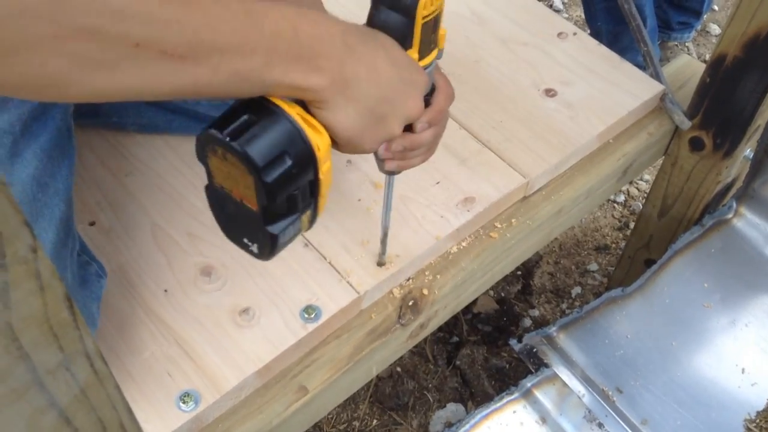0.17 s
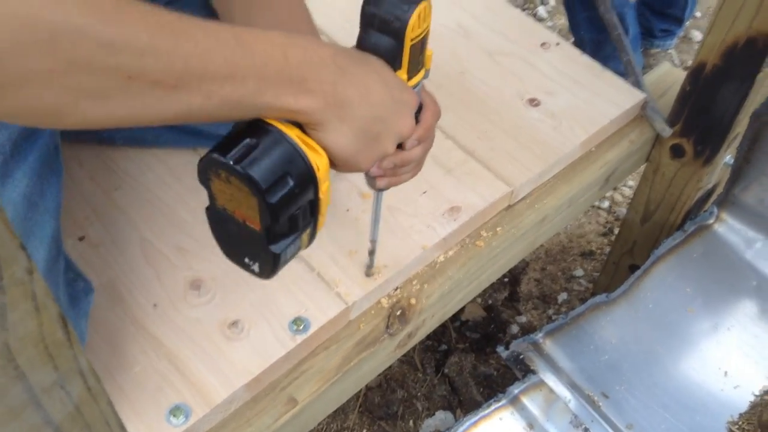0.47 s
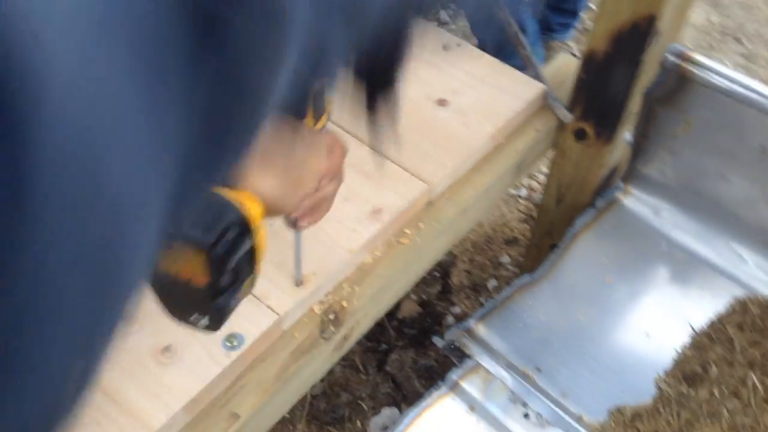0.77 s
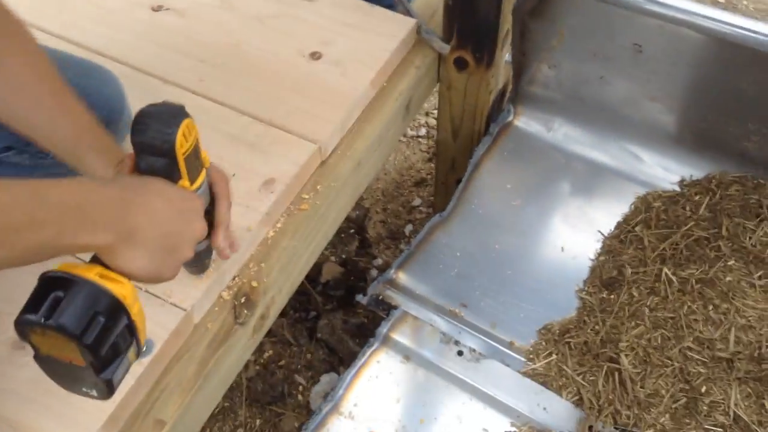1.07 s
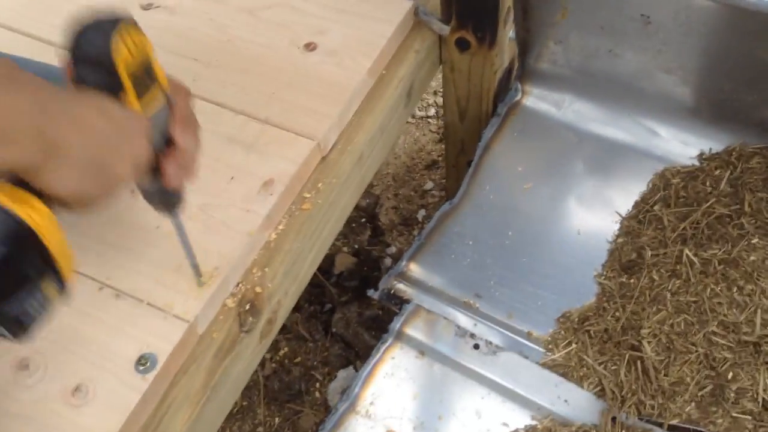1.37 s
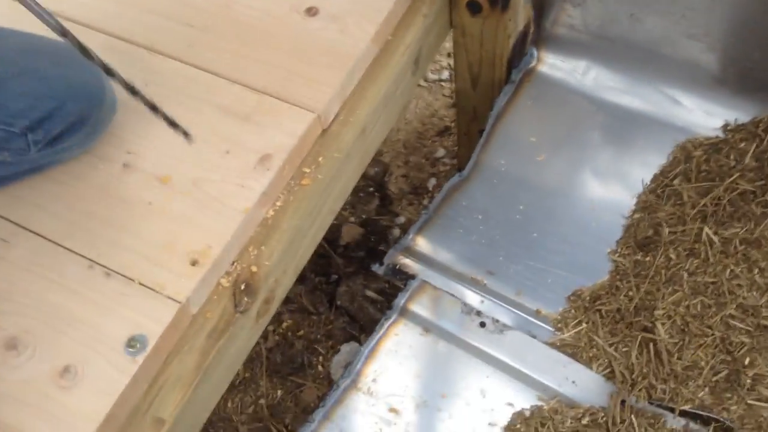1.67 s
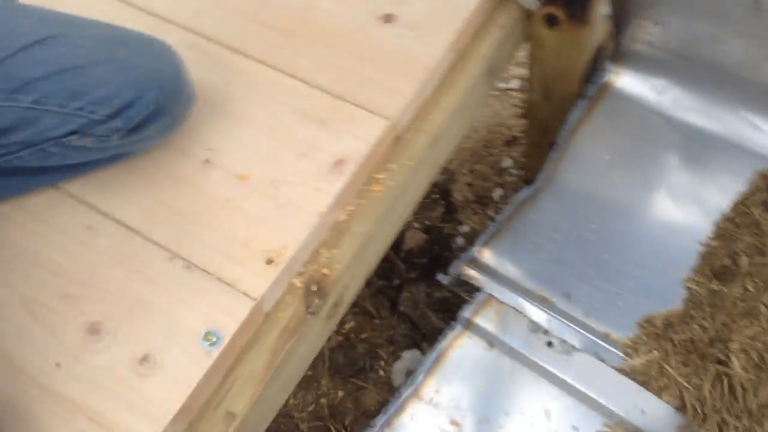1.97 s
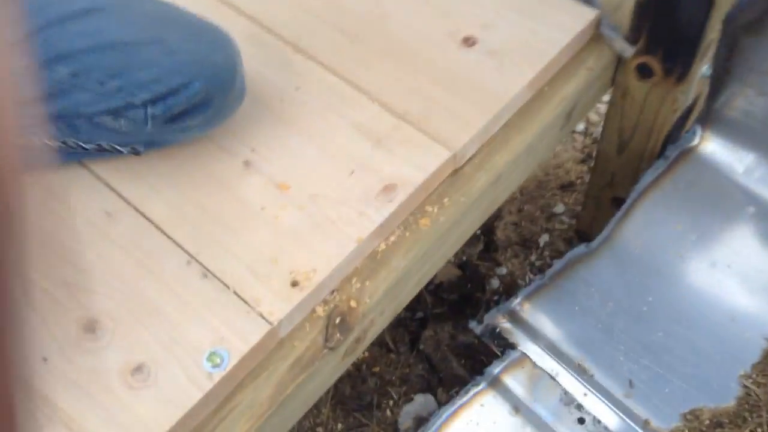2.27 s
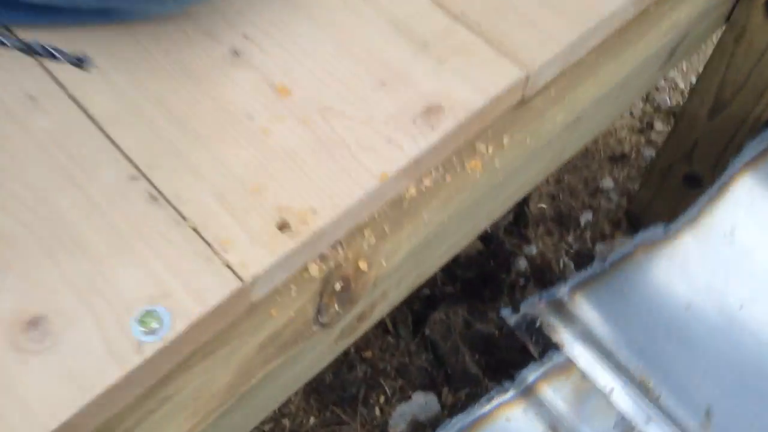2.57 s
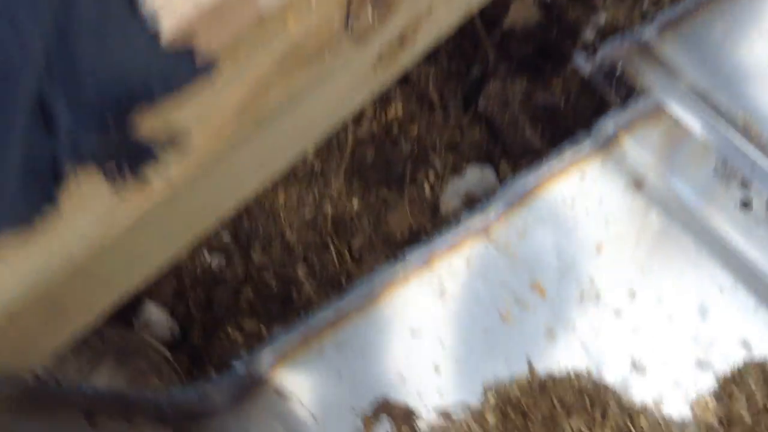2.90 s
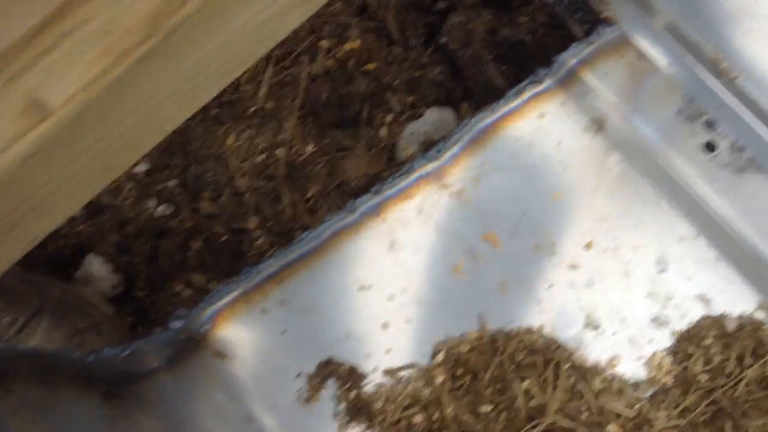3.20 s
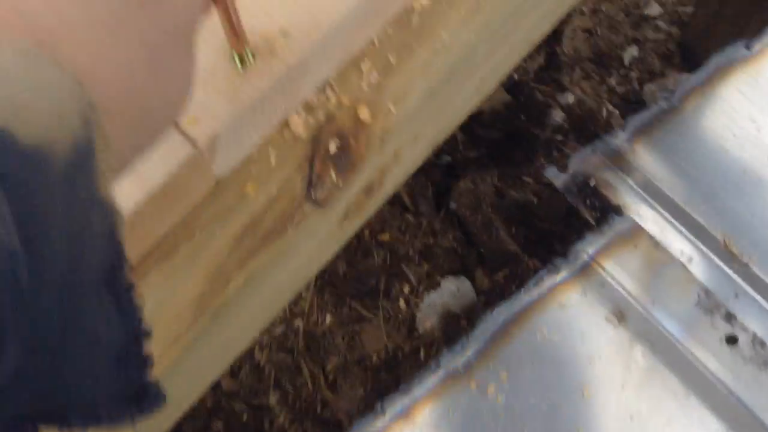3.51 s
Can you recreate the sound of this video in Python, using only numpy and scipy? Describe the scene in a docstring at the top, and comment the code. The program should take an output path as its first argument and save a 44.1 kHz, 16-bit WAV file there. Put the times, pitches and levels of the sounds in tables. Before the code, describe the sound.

Drill grinding into a wooden plank outdoors in buffeting wind, stopping abruptly before light clicks and knocks.

```python
"""Cordless drill in timber

A drill drives a long bit through a plank into a beam, is drawn back out and brakes: grain noise for rasp,
chatter and gears, shaft harmonics for the motor, gliding resonances for squeals and the faint free bit.
Shaped noise makes the wind buffets and open air; struck modes and decaying noise bursts make
a few metal clinks, light ticks and dull knocks on the boards."""
import sys
import numpy as np
from scipy import signal
from scipy.fft import rfft, irfft, next_fast_len
from scipy.io import wavfile
from scipy.ndimage import uniform_filter1d

SR = 44100
rng = np.random.default_rng(int(sys.argv[2]) if len(sys.argv) > 2 else 0)


def dump(signal):
    """Clip the signal to [-1, 1] and save it as 16-bit WAV at the path in sys.argv[1]."""
    limited = np.clip(np.atleast_2d(signal).T, -1, 1)
    pcm = np.round(limited * 32767).astype(np.int16)
    wavfile.write(sys.argv[1], SR, pcm)


N = 160965
T, HZ = np.arange(N) / SR, np.fft.rfftfreq(N, 1 / SR)


def amp(db):
    """Decibels to gain."""
    return 10 ** (np.asarray(db) / 20)


def unit(x):
    """Scales to rms 1."""
    return x / np.sqrt(np.mean(x ** 2) + 1e-20)


def curve(points):
    """Joins (time_s, value) points linearly over the whole scene."""
    return np.interp(T, *np.transpose(points))


def colour(x, points):
    """Filters x by (hz, gain_db) points on a log-frequency axis, to rms 1."""
    hz, db = np.transpose(points)
    gain = amp(np.interp(np.log(HZ + 1), np.log(hz), db))
    bass_loss = 1 + (40 / (HZ + 1)) ** 4
    return unit(irfft(rfft(x) * gain / bass_loss, N))


def noise(shape, size=N):
    """Gaussian noise with the magnitude shape(hz), at rms 1."""
    hz = np.fft.rfftfreq(size, 1 / SR) + 1  # +1 avoids division by zero
    return unit(irfft(rfft(rng.standard_normal(size)) * shape(hz), size))


def drift(rate_hz, size=N):
    """Slow random wavering, low-passed around rate_hz."""
    padded = next_fast_len(size + 8192)
    return noise(lambda f: 1 / (1 + (f / rate_hz) ** 2), size=padded)[:size]


def add(mix, start_s, sound):
    """Mixes a sound in at a time, trimming what falls outside."""
    at = round(start_s * SR)
    sound = sound[max(-at, 0):]
    part = mix[max(at, 0):][:len(sound)]
    part += sound[:len(part)]


def low_cut(x):
    """Second-order high-pass: the small microphone loses the deep bass."""
    return signal.sosfilt(signal.butter(2, 95, "high", fs=SR, output="sos"), x)


def air():
    """Quiet outdoor background noise with a thin, faint band of hiss around 7.5 kHz."""
    # open-air spectrum: hz, density_db
    air_spectrum = [(45, -7), (170, 18.5), (450, 6.5), (4800, -1), (6300, -12), (15000, -27.5)]
    # high hiss band: time_s, level_db
    hiss_level = [(2.3, -67), (2.9, -66.5), (3.25, -76)]
    air_db, hiss_hz, hiss_width_hz = -50.5, 7550, 1900
    hiss = noise(lambda f: 1 / (1 + (2 * (f - hiss_hz) / hiss_width_hz) ** 4))
    return amp(air_db) * colour(rng.standard_normal(N), air_spectrum) + amp(curve(hiss_level)) * hiss


def eddy(corner_hz):
    """Wind turbulence spectrum: steep slopes below 155 Hz and above corner_hz."""
    low_hz, rise_order, fall_order = 155.2, 4.24, 3.23

    def shape(f):
        low_side = 1 + (low_hz / f) ** (2 * rise_order)
        high_side = 1 + (f / corner_hz) ** (2 * fall_order)
        return 1 / np.sqrt(low_side * high_side)
    return shape


def wind():
    """Eddies thump the microphone as short noise swells over a low steady flutter."""
    # steady wind: time_s, mean_level_db
    breeze_level = [(0, -33), (.68, -23.5), (.92, -38.5), (1.2, -32.5), (1.8, -37), (2.2, -30), (2.5, -65),
                    (2.78, -49.5), (3.2, -62), (3.65, -47)]
    # buffets: middle_s, swell_scale_s, level_db, corner_hz
    gusts = [(0.01, 0.0043, -15, 490), (0.065, 0.0074, -22.5, 460), (0.145, 0.0086, -17, 373),
             (0.224, 0.0041, -15, 960), (0.244, 0.014, -17, 475), (0.402, 0.0075, -11.5, 504),
             (0.463, 0.0028, -14.5, 398), (0.489, 0.0075, -19.5, 410), (0.532, 0.0056, -10.5, 765),
             (0.658, 0.0067, -16.5, 740), (0.672, 0.0039, -10.5, 590), (0.737, 0.019, -18.5, 580),
             (1.046, 0.0044, -12.5, 556), (1.103, 0.029, -23.5, 530), (1.195, 0.0035, -11, 385),
             (1.218, 0.0024, -15.5, 430), (1.354, 0.0066, -22.5, 900), (1.449, 0.021, -24.5, 360),
             (1.498, 0.0063, -17.5, 377), (1.8053, 0.0012, -18.5, 810), (1.8168, 0.0066, -25, 646),
             (1.9, 0.014, -32, 480), (2.163, 0.0068, -17, 575), (2.195, 0.0084, -18.5, 640),
             (2.112, 0.0037, -28.5, 473), (2.336, 0.0028, -20, 290), (2.381, 0.0038, -24, 241),
             (2.452, 0.0027, -33, 229), (2.841, 0.0077, -39.5, 453), (3.141, 0.011, -43.5, 553)]
    breeze_hz, flutter_db, flutter_hz = 272, 2, 11.0
    out = amp(curve(breeze_level) + flutter_db * drift(flutter_hz)) * noise(eddy(breeze_hz))
    t = (np.arange(16384) - 8192) / SR
    for middle_s, scale_s, db, corner_hz in gusts:
        swell = 1 / np.cosh(np.minimum(abs(t / scale_s), 10))
        puff = low_cut(swell * noise(eddy(corner_hz), size=len(t)))
        level = amp(db) * np.linalg.norm(swell) / np.linalg.norm(puff)  # same energy as the swell
        add(out, middle_s + t[0], level * puff)
    return out


def ring(modes, width_hz, t):
    """Broad, beating (hz, level_db) modes of a struck object, before decay, at rms 1."""
    def shape(f):
        return sum(amp(db) / (1 + (2 * (f - hz) / width_hz) ** 2) for hz, db in modes)
    return noise(shape, size=len(t))


def click(peak_hz, octaves, t60_s, t):
    """Impact noise around one frequency, decaying exponentially."""
    burst = noise(lambda f: 1 / (1 + abs(np.log2(f / peak_hz) / octaves) ** 3), size=len(t))
    return amp(-60 * t / t60_s) * burst


def handling():
    """Impacts excite board and chuck modes plus noise; clinks leave a faint tail from the yard."""
    # dull knocks on the boards: start_s, level_db, bass_mode_gain_db
    knocks = [(3.187, -30, -5), (3.325, -34, 6.5), (3.357, -24.5, -9), (3.384, -32, 12),
              (3.464, -36.5, -21), (3.481, -25, 8)]
    # board modes: hz, relative_level_db (bass gain is added below 450 Hz)
    board_modes = [(243, 9.5), (387, -3.5), (515, 11.5), (603, 5.5), (748, -0.5)]
    # clinks of chuck and bit: start_s, click_level_db, click_t60_s, click_peak_hz, ring_level_db
    clinks = [(1.6809, -8, 0.017, 5330, -17), (2.2151, -43, 0.044, 10040, -29),
              (2.4329, -27, 0.0085, 7200, -47)]
    # chuck modes: hz, relative_level_db
    chuck_modes = [(4452, 5), (8312, 1.5), (10800, -5), (13190, -6.5)]
    # light ticks: start_s, level_db, peak_hz
    ticks = [(1.833, -36, 2610), (2.494, -41.5, 940), (3.185, -61, 8000), (3.465, -49, 9000),
             (3.477, -50, 8300), (3.556, -43.5, 2600)]
    board_t60_s, board_width_hz, board_attack_s = 0.15, 69, 0.0016
    thud_db, thud_hz = -14, 713  # level relative to the knock
    chuck_t60_s, chuck_width_hz, clink_octaves = 0.05, 240, 0.26
    yard_db, yard_t60_s = -30, 0.29  # level relative to the ring
    tick_t60_s, dull_octaves = 0.038, 0.79

    out, t = np.zeros(N), np.arange(16384) / SR
    for start_s, db, bass_db in knocks:
        modes = [(hz, level + bass_db * (hz < 450)) for hz, level in board_modes]
        envelope = amp(db - 60 * t / board_t60_s) * np.minimum(t / board_attack_s, 1)
        add(out, start_s, envelope * ring(modes, board_width_hz, t))
        add(out, start_s, amp(db + thud_db) * click(thud_hz, dull_octaves, board_t60_s, t))
    for start_s, db, t60_s, hz, ring_db in clinks:
        fade = amp(-60 * t / chuck_t60_s) + amp(yard_db - 60 * t / yard_t60_s)
        add(out, start_s, amp(db) * click(hz, clink_octaves, t60_s, t))
        add(out, start_s, amp(ring_db) * fade * ring(chuck_modes, chuck_width_hz, t))
    for start_s, db, hz in ticks:
        add(out, start_s, amp(db) * click(hz, dull_octaves, tick_t60_s, t))
    return low_cut(out)


def whistle(hz, width_hz):
    """A rubbed resonance that follows a pitch curve, at rms 1."""
    pure_below_hz = 39  # narrower resonances lock into a tone
    waver = drift(width_hz, size=len(hz)) + 1j * drift(width_hz, size=len(hz))
    rub = pure_below_hz / width_hz + waver
    return unit((rub * np.exp(2j * np.pi * np.cumsum(hz) / SR)).real)


def free_bit():
    """The long bit hums faintly out of the wood, swelling, fading and sagging in pitch."""
    # bit resonances: pitch_hz, level_db
    bit_modes = [(2720, -53), (4980, -58), (6420, -60), (7550, -68), (9950, -71)]
    middle_s, half_s, width_ratio, sag_per_s = 1.9, .11, .028, .17
    sag = np.exp(-sag_per_s * np.maximum(T - middle_s, 0))
    hum = sum(amp(db) * whistle(hz * sag, width_ratio * hz) for hz, db in bit_modes)
    return hum / (1 + ((T - middle_s) / half_s) ** 2)


def squeals():
    """Gliding resonances, excited unevenly as the bit rubs the wall of the hole."""
    # squeals and whistles: start_s, length_s, first_hz, last_hz, level_db, width_hz
    squeal_table = [(0, .22, 2160, 2130, -35, 35), (.03, .17, 3670, 3480, -29, 22),
                    (.22, .32, 1668, 1660, -31, 30), (.22, .31, 7380, 7290, -30, 40),
                    (.2, .34, 7650, 7560, -27, 170), (.97, .19, 7400, 7570, -31, 40),
                    (1.18, .23, 7330, 6850, -27, 160), (1.22, .2, 3850, 3380, -27, 130),
                    (1.56, .15, 4290, 4210, -31, 20), (1.5, .22, 1500, 1300, -36, 90),
                    (.5, .4, 7200, 6350, -27, 60), (.64, .27, 3450, 3080, -31, 130),
                    (.93, .45, 1700, 1720, -40, 22), (1.24, .3, 2820, 2560, -35, 130),
                    (1.2, .51, 5600, 6000, -29, 260), (1.5, .21, 8750, 8400, -31, 330)]
    fade_s, wobble_ratio, wobble_hz = 0.021, 0.00176, 22.0
    out = np.zeros(N)
    for start_s, length_s, first_hz, last_hz, db, width_hz in squeal_table:
        t = np.arange(0, length_s, 1 / SR)
        glide_hz = first_hz + (last_hz - first_hz) * t / length_s
        hz = glide_hz * (1 + wobble_ratio * drift(wobble_hz, size=len(t)))
        fade = np.clip(np.minimum(t, length_s - t) / fade_s, 0, 1)
        add(out, start_s, amp(db) * fade * whistle(hz, width_hz))
    return out


def grains():
    """Dense tiny impacts whose colour shifts in time-frequency patches."""
    grains_per_s, patchy_db = 9000, 2.5
    clicks = rng.standard_normal(N) * (rng.random(N) < grains_per_s / SR)
    z = signal.stft(clicks, nperseg=1024, noverlap=768)[2]
    patches = uniform_filter1d(rng.standard_normal(z.shape), size=4, axis=0)  # across frequency
    patches = unit(uniform_filter1d(patches, size=12, axis=1))  # across time
    return signal.istft(z * amp(patchy_db * patches), nperseg=1024, noverlap=768)[1][:N]


def motor(count=40):
    """Wavering multiples of the shaft speed, from the commutator and gear teeth."""
    # shaft speed, first sagging as the bit goes deeper: time_s, turns_per_s
    speed = [(0, 252.3), (.88, 209), (1.08, 268.2), (1.65, 302.2)]
    turns = np.cumsum(curve(speed) * (1 + 0.0034 * drift(39))) / SR
    strength = rng.standard_normal((count, 48))
    knots_s = np.linspace(0, T[-1], 48)
    out = np.zeros(N)
    for k in range(5, count):
        phase = 2 * np.pi * (k * turns + rng.random())
        out += np.interp(T, knots_s, strength[k]) * np.sin(phase)
    return out


def drill():
    """Rasp of the cutting edges, chatter of the bit and rattle of the gears, cut off by the brake."""
    # levels before the trims below: time_s, rasp_db, chatter_db, gears_db
    effort = [(0, -29.5, -29, -30.5), (0.1, -21, -23, -25), (0.2, -20.5, -20, -27), (0.23, -18, -19.5, -26),
              (0.52, -15.5, -15.5, -28.5), (0.545, -20.5, -23, -29.5), (0.76, -21.5, -29.5, -31.5),
              (0.95, -26, -23.5, -31.5), (1.02, -20.5, -19.5, -29.5), (1.34, -17.5, -17, -27.5),
              (1.48, -25.5, -21.5, -25.5), (1.68, -37, -34.5, -26.5)]
    # spectra: hz, density_db
    rasp_spectrum = [(1500, -47), (4200, -5), (5900, -4), (7400, -1), (8500, -1), (9700, -7),
                     (14300, -10.5), (15500, -19.5)]
    chatter_spectrum = [(2400, -31), (3200, -14), (3550, 1), (3950, -9), (5000, -2.5), (6600, -13),
                        (10000, -34.5)]
    gear_spectrum = [(1150, -8), (1400, -3), (2100, 1), (2400, -3), (3000, 1), (6200, 1.5), (15000, -12)]
    rasp_trim_db, chatter_trim_db, rattle_trim_db, motor_trim_db = -2.5, -4.5, 5, -5
    flutter_db, flutter_hz, stop_s, brake_db_per_s = 0.6, 30, 1.697, 778

    time_s, *levels = np.transpose(effort)
    rasp_db, chatter_db, gears_db = (np.interp(T, time_s, level) for level in levels)
    rasp = amp(rasp_db + rasp_trim_db) * colour(grains(), rasp_spectrum)
    chatter = amp(chatter_db + chatter_trim_db) * colour(grains(), chatter_spectrum)
    rattle = amp(gears_db + rattle_trim_db) * colour(grains(), gear_spectrum)
    whine = amp(gears_db + motor_trim_db) * colour(motor(), gear_spectrum)
    brake_db = brake_db_per_s * np.maximum(T - stop_s, 0)
    return (rasp + chatter + rattle + whine) * amp(flutter_db * drift(flutter_hz) - brake_db)


def scene():
    """Everything reaches one microphone in the open air; both channels are equal."""
    mono = air() + wind() + handling() + free_bit() + squeals() + drill()
    return np.array([mono, mono])


def record(dry):
    """Clips peaks at full scale, then low-passes at the band limit."""
    edge_hz = 15400
    band_limit = signal.firwin(511, edge_hz, window=("kaiser", 9), fs=SR)
    return signal.oaconvolve(np.clip(dry, -1, 1), band_limit[None], "same")


dry = scene()
out = record(dry)
dump(out)
```